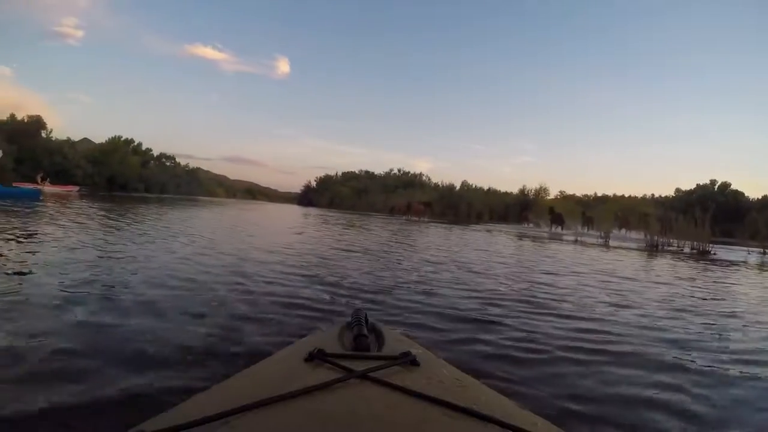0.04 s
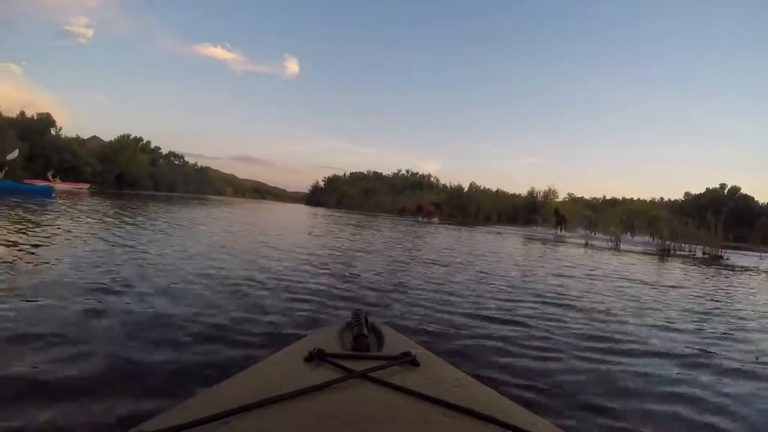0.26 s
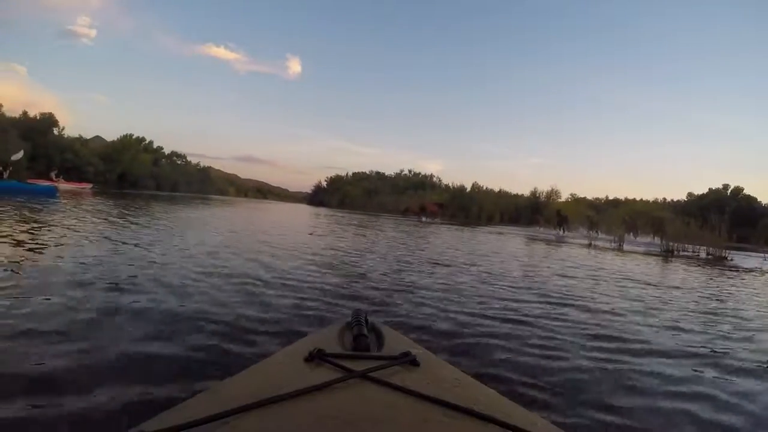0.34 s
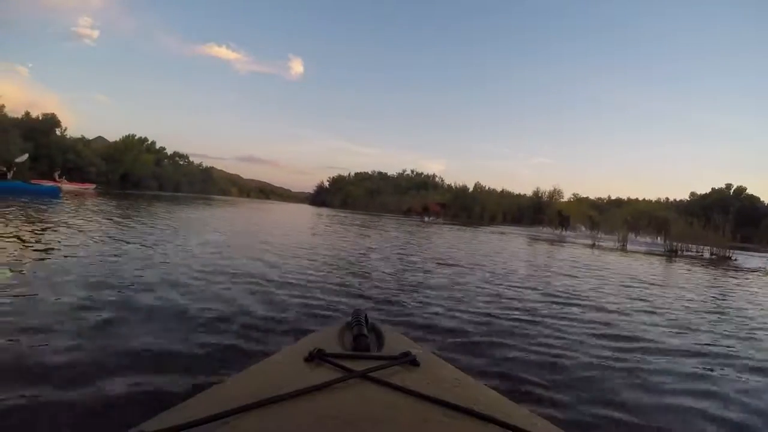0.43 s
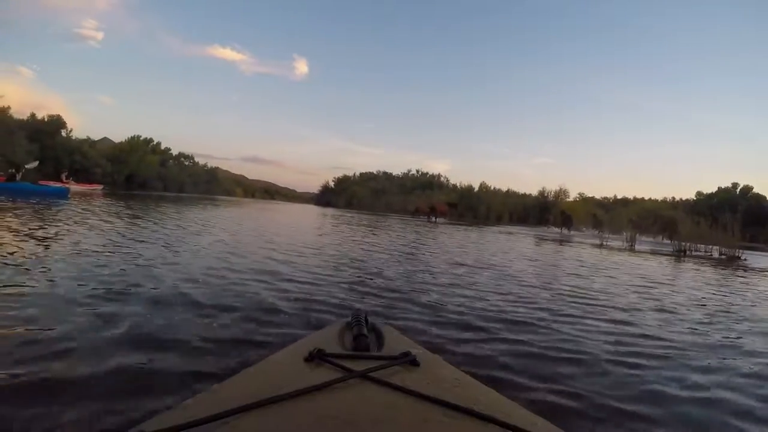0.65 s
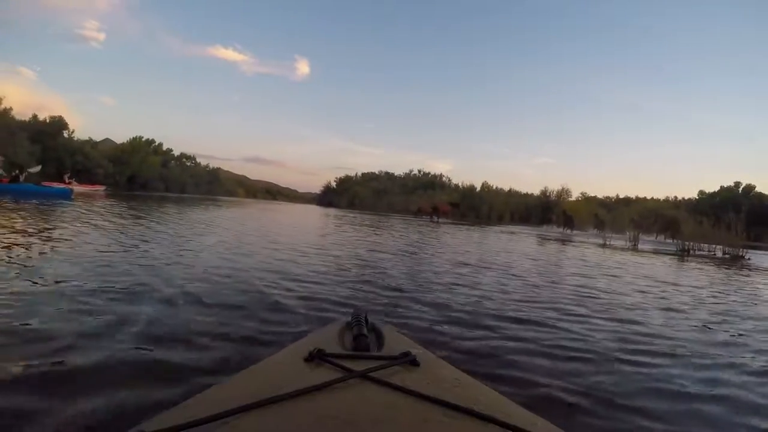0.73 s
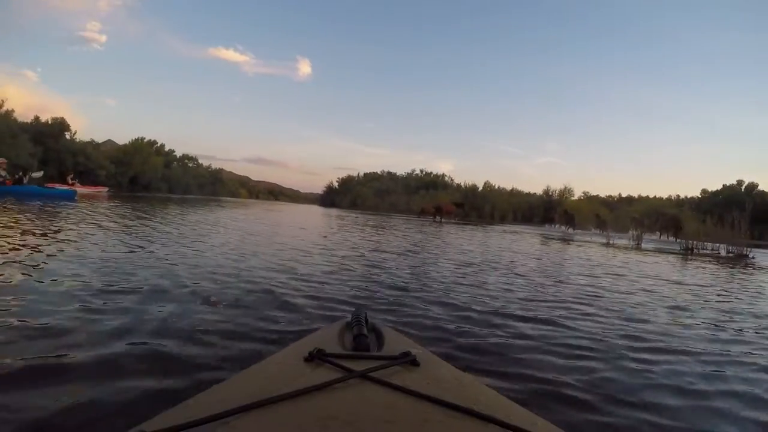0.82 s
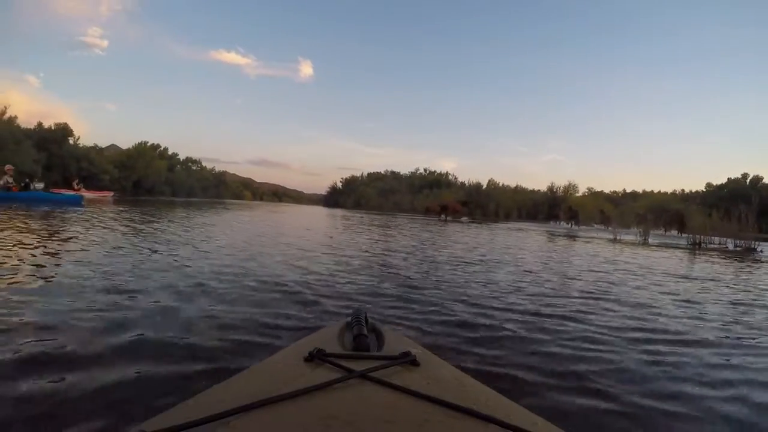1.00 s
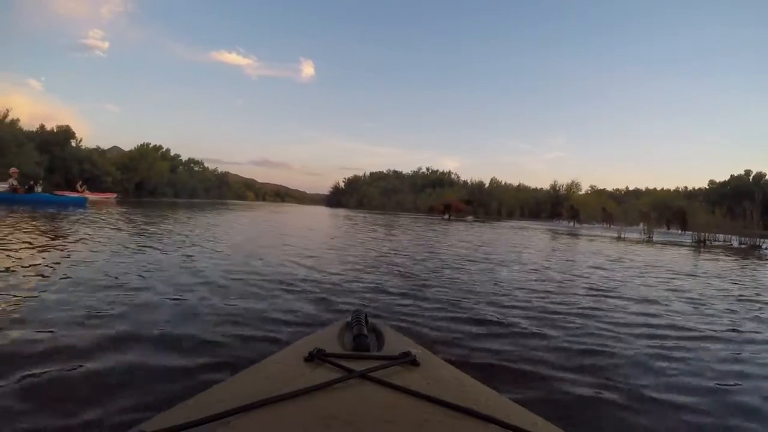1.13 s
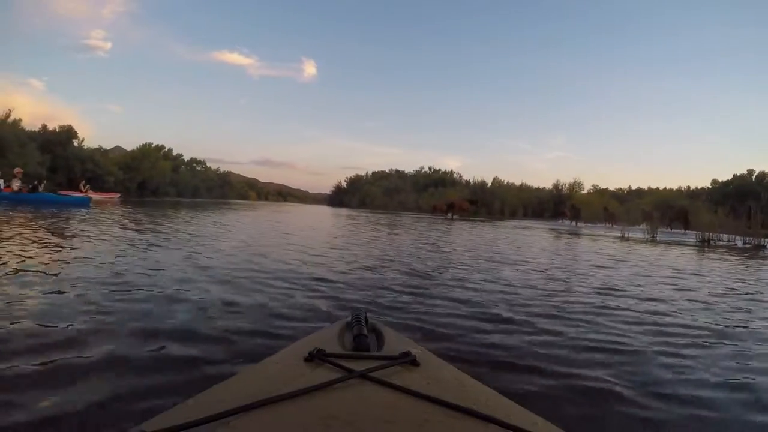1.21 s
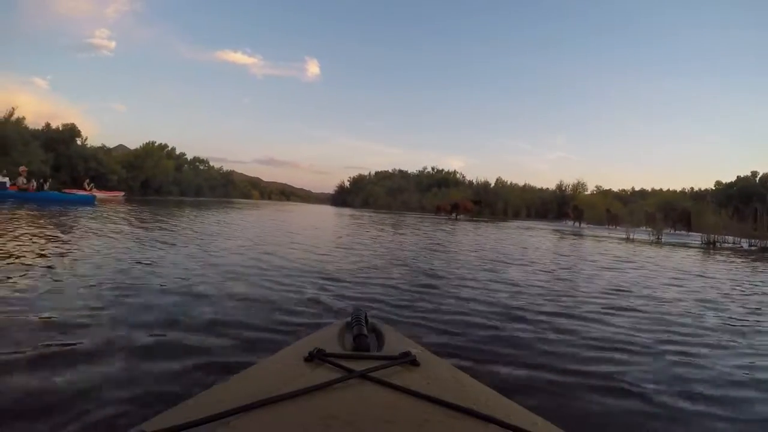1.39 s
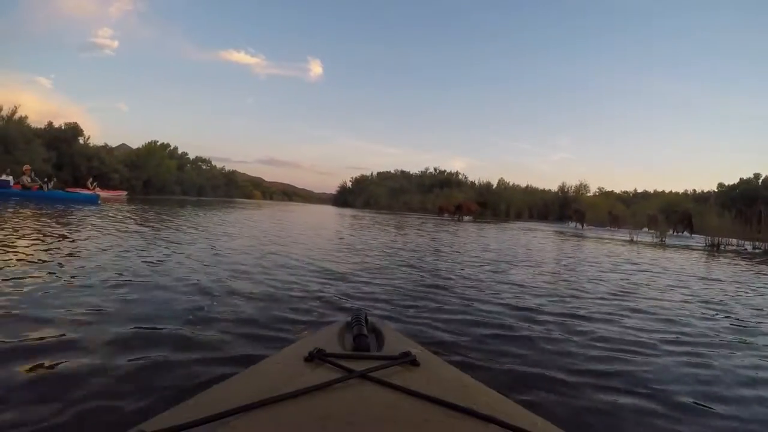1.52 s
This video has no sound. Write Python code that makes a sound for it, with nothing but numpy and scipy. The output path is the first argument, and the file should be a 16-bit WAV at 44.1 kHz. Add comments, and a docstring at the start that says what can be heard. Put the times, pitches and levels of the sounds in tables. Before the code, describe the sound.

Hollow thumps knock on a plastic kayak hull, heard close from the deck. Soft bumps lead to a cluster of harder knocks with a brief rattle, then weaker bumps, over faint air hiss and tiny water plips.

```python
"""A faint hiss of air and a tiny water plip come first, heard from the deck of a kayak on calm water.
Then something bumps against the plastic hull, close by. Each bump clicks at the contact, clacks in
the shell, shoves the wall with a dull thud and sets the hollow hull booming. A loose fitting chatters
after the hard bumps; underneath, the deck keeps wobbling and a few more bubbles plip. Mono."""
import sys
import numpy as np
from scipy import signal
from scipy.fft import rfft, irfft
from scipy.io import wavfile

SR = 44100
rng = np.random.default_rng(int(sys.argv[2]) if len(sys.argv) > 2 else 0)


def log_audio(samples):
    """Write samples as a 16-bit WAV file to the path given in sys.argv[1]."""
    # one column per channel
    frames = np.atleast_2d(samples).T
    # limit to full scale, then quantise
    limited = np.clip(frames, -1, 1)
    pcm = np.round(limited * 32767).astype(np.int16)
    wavfile.write(sys.argv[1], SR, pcm)


N = 68355


def amp(db):
    """Decibels to gain."""
    return 10 ** (np.asarray(db) / 20)


def add(mix, s, sound):
    """Mixes a sound in at a time."""
    part = mix[max(round(s * SR), 0):][:len(sound)]
    part += sound[:len(part)]


def noise(spectrum, size):
    """Noise of rms 1 with a given spectrum."""
    hz, (f, db) = np.fft.rfftfreq(size, 1 / SR), np.transpose(spectrum)
    gain = amp(np.interp(np.log(hz + 1), np.log(f), db))
    x = irfft(rfft(rng.standard_normal(size)) * gain, size)
    return x / x.std()


def decay(t, t60):
    """Exponential fall of 60 dB in t60."""
    return np.exp(-np.log(1000) * t / t60)


def swell(t, peak_s):
    """Smooth rise to 1, then a fall."""
    return t / peak_s * np.exp(1 - t / peak_s)


MODE_SCATTER_DB, MODE_DETUNE = 3.5, .002
def ring(modes, t, ring_share):
    """Dying sines of alternating sign; each contact point weights and detunes them a little."""
    chance = rng.standard_normal((len(modes), 2))
    return sum((-1) ** k * amp(db + MODE_SCATTER_DB * a) * decay(t, t60 * ring_share)
               * np.sin(2 * np.pi * hz * (1 + MODE_DETUNE * b) * t)
               for k, ((hz, db, t60), (a, b)) in enumerate(zip(modes, chance)))


AIR_DB, AIR_FADE_DB_PER_S = -77.5, -2
WHINE_HZ, WHINE_DB = 5020, -99
# Open air over the water: f/Hz, relative level/dB per Hz
AIR_SPECTRUM = [(30, 10), (300, 0.5), (600, 0), (950, 1.5), (1400, 2), (1850, 2.5), (2200, -7), (3000, -4),
                (3700, -1), (4600, -10), (6300, -11), (7300, -7), (8200, -14.5), (9600, -8.5), (11000, -13),
                (12000, -21), (14000, -16)]
def air(t):
    """An even, slowly fading hiss around the microphone, with a very faint whine."""
    hiss = amp(AIR_DB + AIR_FADE_DB_PER_S * t) * noise(AIR_SPECTRUM, N)
    whine = amp(WHINE_DB) * np.sin(2 * np.pi * WHINE_HZ * t)
    return hiss + whine


WOBBLE_HZ, RUMBLE_RELATIVE_DB = 30.3, -5
# Shaking of the deck under the microphone: t/s, level/dB
DECK_LEVEL = [(0, -76), (.08, -72), (.2, -64.5), (.28, -50), (.5, -53.5), (.72, -42), (.88, -49.5),
              (1.02, -58), (1.1, -51), (1.3, -58), (1.55, -66)]
# Rumble of the deck: f/Hz, relative level/dB per Hz
RUMBLE_SPECTRUM = [(10, -16.5), (22, -4), (31, 7.5), (44, -6), (60, -1), (100, -8.5), (190, -13),
                   (280, -39.5), (600, -52.5), (2000, -82)]
def deck(t):
    """The shaken deck wobbles at its lowest mode and rumbles."""
    wobble = np.sin(2 * np.pi * WOBBLE_HZ * t)
    rumble = amp(RUMBLE_RELATIVE_DB) * noise(RUMBLE_SPECTRUM, N)
    level_db = np.interp(t, *np.transpose(DECK_LEVEL))
    return amp(level_db) * (wobble + rumble)


PLIP_PEAK_S, PLIP_GLIDE_PER_S = 0.003, 16
# Bubbles beside the hull: t/s, starting f/Hz, level/dB
BUBBLES = [(0.042, 800, -69.5), (.942, 1250, -71), (1.232, 907, -69.5), (1.447, 848, -64.5),
           (1.451, 1187, -75.5)]
def plips(t):
    """Each small bubble rings for a moment, rising in pitch."""
    out, t = np.zeros(N), t[:SR // 20]
    for s, hz, db in BUBBLES:
        phase = 2 * np.pi * hz * t * (1 + PLIP_GLIDE_PER_S * t / 2)
        add(out, s, amp(db) * swell(t, PLIP_PEAK_S) * np.sin(phase))
    return out


CLICK_RISE_S = 0.00022
# Hard contact on the plastic: f/Hz, relative level/dB, t60/s
CLICK_MODES = [(725, -0.5, 0.015), (1160, -3.5, 0.003), (2464, -15, 0.023), (3530, -14.5, 0.0046),
               (5320, -26.5, 0.0038), (6540, -15, 0.0016), (10000, -23.5, 0.0016)]
def click(t):
    """A very short snap at the point of contact."""
    onset = 1 - np.exp(-(t / CLICK_RISE_S) ** 2)
    return onset * sum(amp(db) * decay(t, t60) * np.sin(2 * np.pi * hz * t)
                       for hz, db, t60 in CLICK_MODES)


SHELL_DB, CROWD_DB, CRACK_DB = -8.5, -1.5, 0.5  # balance within a clack
CROWD_FREE_T60_S, CRACK_T60_S, CLACK_RISE_S = 0.099, 0.019, 0.0022
# Shell panels: f/Hz, relative level/dB, free t60/s
SHELL_MODES = [(448, -14, 0.18), (485, -7, 0.14), (565, -16.5, .12), (648.2, -1, 0.11), (706, -7, 0.13),
               (809.6, -6, 0.092), (861, -7, 0.13), (1001, -4.5, 0.12), (1170, -4, 0.069),
               (1317, -13, 0.13), (1448, -13, 0.067), (2506, -16, 0.13), (2560, -15, 0.051)]
# Crowd of weak overtones in the shell: f/Hz, relative level/dB per Hz
CROWD_SPECTRUM = [(100, 5), (300, 5), (650, -1.5), (1200, -1.5), (1800, -16), (2200, -17.5), (2550, -6.5),
                  (3200, -20.5), (6000, -19), (12000, -27.5)]
# Crack of first contact: f/Hz, relative level/dB per Hz
CRACK_SPECTRUM = [(100, -8), (400, -18), (750, 18.5), (1200, 6), (1900, -9.5), (2700, -5), (4000, -21),
                  (6500, -15), (12000, -11.5)]
def clack(t, bright_hz, ring_share):
    """The shell cracks and rings; a softer contact takes the treble away."""
    panels = amp(SHELL_DB) * ring(SHELL_MODES, t, ring_share)
    crowd = amp(CROWD_DB) * noise(CROWD_SPECTRUM, len(t)) * decay(t, CROWD_FREE_T60_S * ring_share)
    crack = amp(CRACK_DB) * noise(CRACK_SPECTRUM, len(t)) * decay(t, CRACK_T60_S)
    onset = np.minimum(t / CLACK_RISE_S, 1)
    lowpass = signal.butter(2, min(bright_hz, SR / 3), fs=SR)
    return signal.lfilter(*lowpass, (panels + crowd + crack) * onset)


THUD_PEAK_CYCLES, THUD_SAG = 0.71, 0.18
def thud(t, hz):
    """The wall gives way for a cycle or two, damped by the water; its pitch sags."""
    peak_s = THUD_PEAK_CYCLES / hz
    pitch = hz * (1 + THUD_SAG * (2 * np.exp(-t / (2 * peak_s)) - 1))
    return swell(t, peak_s) * np.sin(2 * np.pi * np.cumsum(pitch) / SR)


BOOM_RISE_S = 0.0061
# Hollow hull below the microphone: f/Hz, relative level/dB, free t60/s
HULL_MODES = [(61.2, 0.5, .6), (89, 3, 0.4), (110.1, -8, .28), (145, -6.5, 0.21), (181.4, 4.5, 0.3),
              (200.8, -11, 0.18), (232.5, -22.5, 0.34), (313.3, -15, 0.2), (409.4, -15.5, .17)]
def boom(t, ring_share):
    """The low modes of the hollow hull build up and ring out."""
    return ring(HULL_MODES, t, ring_share) * (1 - np.exp(-t / BOOM_RISE_S)) / 2


BASS_LAG_S = .003
# Bumps on the hull, close by: t/s, thud level/dB, thud f/Hz, boom level/dB, share of the free
# ring time (a lingering contact damps it), clack level/dB, clack cutoff f/Hz, click level/dB
HULL_BUMPS = [ (0.077, -66.5, 177, -62, 0.39, -97, 700, -89),
              (.208, -55, 181, -47.5, 0.71, -66.5, 850, -64),
              (0.227, -41, 102.6, -48.5, 0.95, -61, 950, -101),
              (.264, -39, 106.5, -45.5, .9, -63.5, 970, -81), (.345, -68, 94, -60.5, 1.23, -54, 1470, -49),
              (.354, -36.5, 107, -40.5, 1.03, -63.5, 596, -95),
              (.530, -29, 115.4, -31.5, 0.9, -32.5, 1480, -60),
              (0.5323, -33.5, 65.7, -42.5, 0.96, -32.5, 1540, -28),
              (0.537, -26.5, 145, -32.5, 1.36, -37, 1550, -37.5),
              (.553, -41.5, 253, -40.5, 1.4, -49.5, 2370, -67.5),
              (.609, -32, 73.7, -33.5, 0.82, -36.5, 1180, -47),
              (.615, -37, 115.4, -51.5, 0.84, -41.5, 1200, -53),
              (0.623, -41.5, 396, -63, 2, -45, 1420, -58.5),
              (.635, -33.5, 169.6, -32.5, 0.72, -37.5, 643, -78.5),
              (0.7374, -32.5, 91.6, -36.5, 0.67, -33, 1300, -44.5),
              (0.743, -39.5, 216, -57.5, 0.72, -38, 1190, -50),
              (.778, -43.5, 173, -38.5, 0.58, -62, 687, -96),
              (1.054, -42.5, 260, -57.5, 0.74, -52.5, 1150, -55),
              (1.059, -35.5, 131, -41.5, 0.55, -74, 478, -85), (1.244, -58, 133, -56.5, .7, -80, 618, -95),
              (1.352, -67, 222.6, -67.5, .6, -69, 640, -86),
              (1.445, -43.5, 110.3, -55.5, 0.44, -67.5, 884, -78.5),
              (1.483, -53.5, 87, -56, 0.35, -84, 583, -103)]
def bumps(t):
    """Click and clack reach the microphone first; the slower bending waves of thud and boom follow."""
    out, t = np.zeros(N), t[:SR]
    for s, thud_db, thud_hz, boom_db, ring_share, clack_db, bright_hz, click_db in HULL_BUMPS:
        bass = amp(thud_db) * thud(t, thud_hz) + amp(boom_db) * boom(t, ring_share)
        add(out, s, amp(click_db) * click(t[:SR // 20]))
        add(out, s, amp(clack_db) * clack(t[:SR // 2], bright_hz, ring_share))
        add(out, s + BASS_LAG_S, bass)
    return out


RATTLE_RISE_S = 0.0029
# Loose fitting on the deck: f/Hz, relative level/dB, free t60/s
FITTING_MODES = [(2471, -1, 0.055), (2577, -8, 0.054), (2770, -10, 0.02), (1333, 1, 0.063)]
# Its touches after the hard bumps: t/s, level/dB
FITTING_TOUCHES = [(.543, -49), (.556, -55.5), (0.569, -53), (.620, -62.5), (0.745, -58.5)]
def rattles(t):
    """The loose fitting chatters, ringing briefly at each touch."""
    out, t = np.zeros(N), t[:SR // 10]
    onset = np.minimum(t / RATTLE_RISE_S, 1)
    for s, db in FITTING_TOUCHES:
        add(out, s, amp(db) * ring(FITTING_MODES, t, ring_share=0.78) * onset)
    return out


def scene():
    """Everything as heard by one microphone on the deck."""
    t = np.arange(N) / SR
    return (bumps(t) + plips(t) + deck(t) + air(t) + rattles(t))[None]


EDGE_HZ = 14200
def record(dry):
    """The band limit of the recorder."""
    lowpass = signal.firwin(511, EDGE_HZ, window=("kaiser", 9), fs=SR)
    return signal.oaconvolve(dry, lowpass[None], "same")


dry = scene()
out = record(dry)
log_audio(out)
```